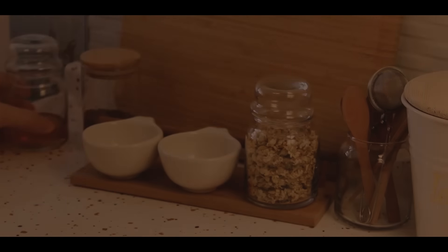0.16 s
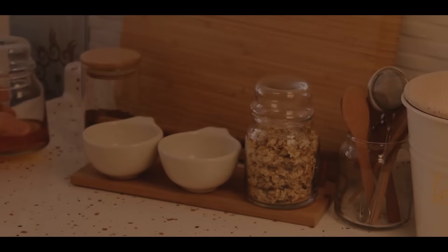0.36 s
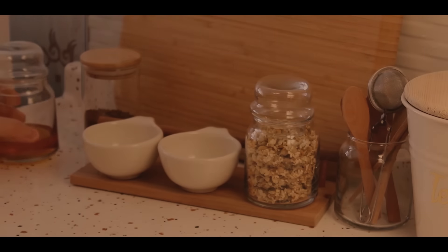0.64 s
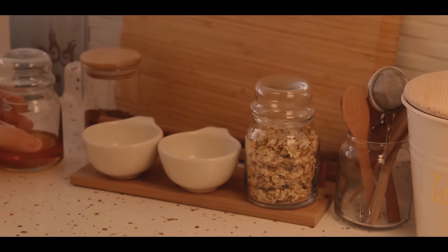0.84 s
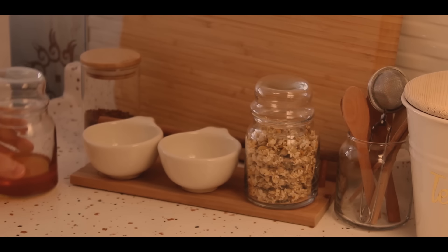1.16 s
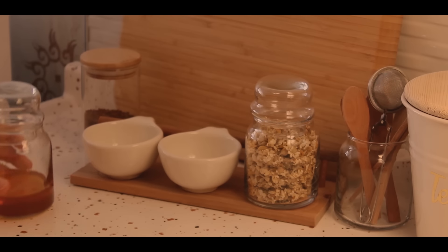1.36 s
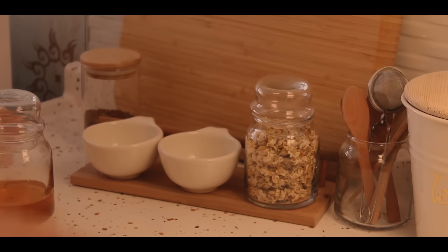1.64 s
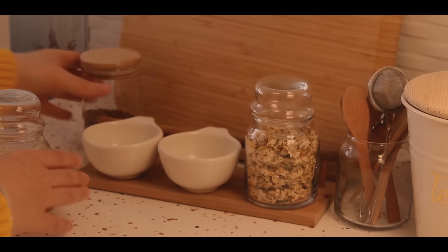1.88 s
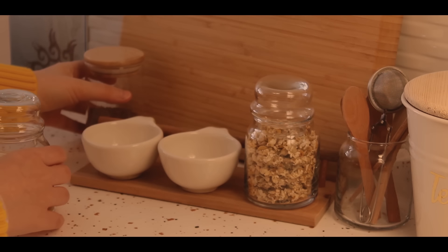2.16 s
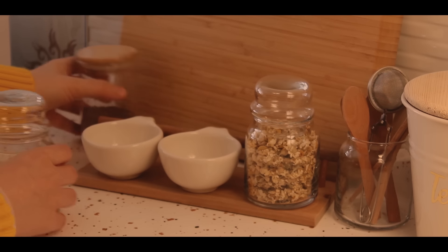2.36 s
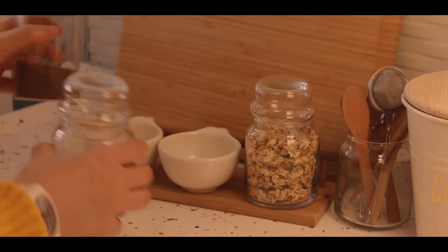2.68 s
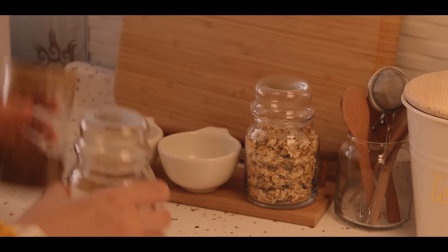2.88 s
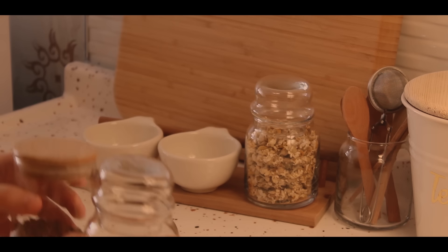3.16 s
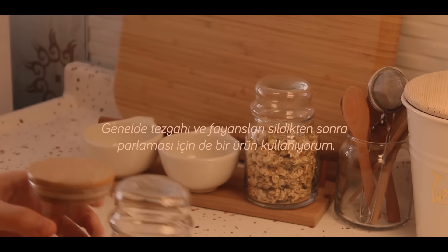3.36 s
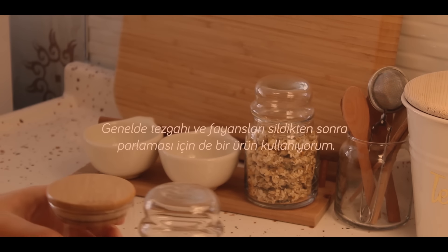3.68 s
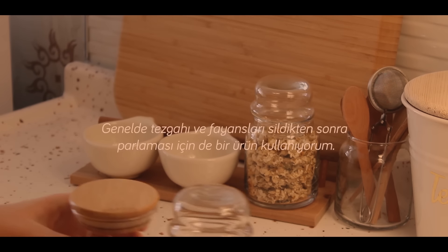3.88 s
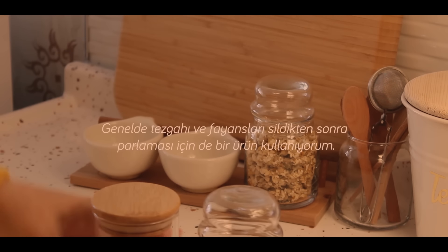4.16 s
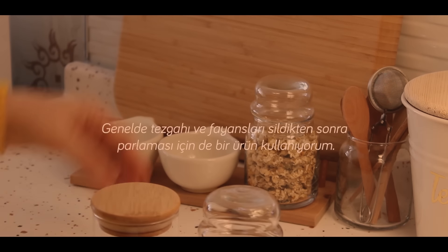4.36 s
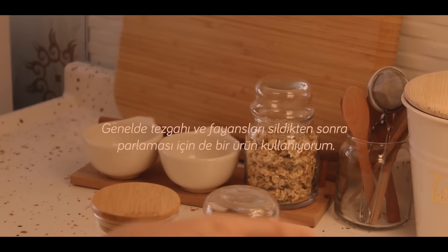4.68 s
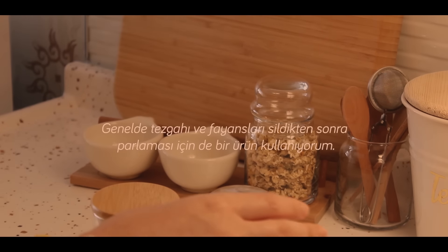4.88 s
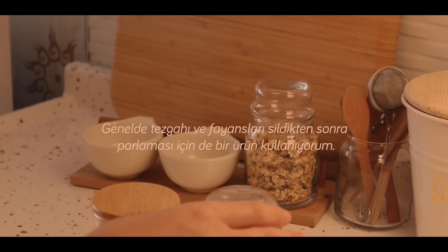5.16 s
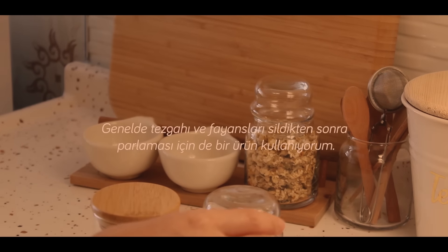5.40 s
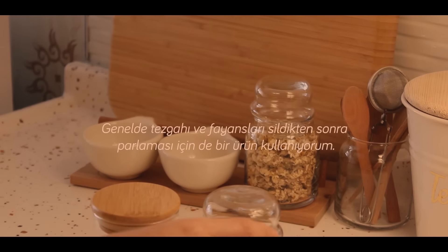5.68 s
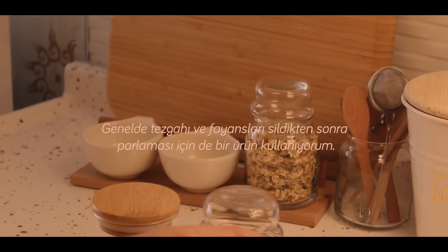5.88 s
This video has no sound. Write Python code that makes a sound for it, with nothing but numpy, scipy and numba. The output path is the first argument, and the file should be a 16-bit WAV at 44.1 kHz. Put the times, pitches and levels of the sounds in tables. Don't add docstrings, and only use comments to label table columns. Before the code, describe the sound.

Glass jars and a wooden-lidded canister are set down on a hard kitchen counter in spaced, dull knocks with brief scrapes, over quiet fridge hum.

```python
import sys
import numpy as np
from scipy import signal
from scipy.fft import rfft, irfft, next_fast_len
from scipy.io import wavfile
from scipy.ndimage import uniform_filter1d
from numba import njit

SR = 44100
rng = np.random.default_rng(int(sys.argv[2]) if len(sys.argv) > 2 else 0)


def magnitude_from_level(level_db):
    exponent = np.asarray(level_db, float) / 20
    return 10 ** exponent


def unload_wav(signal):
    wavfile.write(
        sys.argv[1],
        SR,
        np.round(np.clip(np.atleast_2d(signal).T, -1, 1) * 32767).astype(np.int16),
    )


N = 266099
SPAN = 32768

# (frequency [Hz], density [dB per Hz])
AIR_COLOUR = [(71, -49.5), (120, -12), (166, -13), (188, -18), (288, -4), (360, -9), (498, -5.5),
              (586, -8.5), (994, -10), (1100, -11.5), (2430, -18.5), (13700, -35.5), (15400, -47.5)]
# (frequency [Hz], level [dB])
FRIDGE_LINES = [(199.2, -79.5), (279.9, -76), (393.0, -75), (446.8, -79.5), (495.3, -74.5), (543.7, -80.5),
                (893.6, -85.5)]
# (frequency [Hz], width [Hz], level [dB])
HOUSE_RUMBLE = [(30, 30, -97.5), (50.35, 17, -88.5), (72, 30, -102), (105, 40, -93), (164.4, 19, -82)]
# (frequency [Hz], T60 [s])
ROOM_DECAY = [(100, 0.2), (250, 0.38), (500, 0.46), (1000, 0.42), (2000, 0.34), (4000, 0.23), (8000, 0.092),
              (14000, 0.14)]
# (full speed at [s], held [s], level [dB], resonance [Hz])
DRAGS = [(.24, 0.012, -58, 700), (.36, .02, -59, 1200), (1.16, 0.12, -52.5, 500), (1.27, 0.037, -50.5, 534),
         (1.32, 0.035, -48, 720), (1.39, 0.027, -52, 720), (1.45, .04, -54, 910), (1.54, 0.055, -56.5, 850),
         (2.3, .004, -55, 800), (2.56, 0.067, -64.5, 602), (3.53, .004, -55, 683.5),
         (5.45, 0.044, -54, 860), (5.569, 0.017, -61, 500)]

# its blows (time [s], peak [dB], contact [ms]),
# its colour (frequency [Hz], density [dB per Hz]), its resonances (frequency [Hz], width [Hz], level [dB]).
HONEY_JAR = ([(0.841, -11.5, 4.5)], [(88, -62), (150, -37.5), (290, -25), (579, -1), (658, -4.5),
              (1230, -7), (1700, -8.5), (2540, -30.5), (7000, -78.5), (9100, -105), (15400, -120)],
              [(617, 30, -1.5), (705, 73, 5), (1258, 54, 13), (1710, 32, -1)])
JAR_WOBBLE = ([(0.961, -25, 4.9), (1.042, -36, 5.5), (1.093, -31.5, 8.5), (1.129, -58, 6.8),
               (1.271, -40, 5), (1.429, -42, 4.3)], [(120, -51), (200, -28.5), (447, -4), (490, -4),
               (728, -7), (843, -4), (1740, -27), (3000, -65), (3900, -67), (6600, -120)], [(510, 16, 0.12),
               (624, 40, 0), (695, 30, -1)])
JAR_LIFT = ([(2.314, -15, 3.34)], [(150, -64), (280, -35), (390, -10), (520, -24.5), (680, -9.5),
             (1000, -7.5), (1800, -18), (2100, -29), (2600, -26.5), (3600, -41), (5000, -54), (10000, -72),
             (14000, -110)], [(409, 35, 4), (670, 24, 0.5), (1345, 33, -4.5), (1702, 35, -1)])
HEAVY_JAR = ([(3.542, -.6, 3.2)], [(120, -54.5), (200, -26.5), (379, -7), (430, -12), (486, -5.5),
              (602, -7.5), (772, -3.5), (1340, -2), (1750, -7.5), (2240, -11), (3200, -24.5), (8820, -60),
              (11300, -63), (12600, -73)], [(497, 40, -5), (838, 90, -2.5), (1020, 35, -2.5), (1282, 40, 2),
              (1530, 24, 2), (1820, 46, -4), (2410, 30, 1)])
BASE_EDGE = ([(3.709, -9, 1.15)], [(120, -58), (200, -28), (561, -1), (639, -2), (1430, -2.5), (1550, -2),
              (2110, -12.5), (2290, -7.5), (3080, -12), (4060, -37.5), (10000, -78), (13000, -103),
              (22000, -120)], [(791, 140, -7.5), (1220, 63, -1), (1594, 40, 15), (2310, 80, 1)])
JAR_ROCK = ([(3.861, -16, 5.5)], [(240, -62), (400, -29.5), (600, -20), (900, -6.5), (1300, -3.5),
             (1800, -12.5), (2700, -11.5), (4500, -32.5), (6000, -59.5), (8000, -68), (11000, -100)],
             [(1300, 270, -1.7), (1525, 30, -2)])
JAR_SETTLE = ([(4.036, -30.5, 8.4)], [(240, -62), (400, -34), (693, -19), (770, -7.5), (1120, -10),
               (1310, -2.5), (2140, -18), (4000, -68), (5200, -81.5), (8800, -120)], [(780, 40, -24),
               (1400, 12.2, 3.5)])
SOFT_TOUCH = ([(5.176, -29.5, 14)], [(59, -62), (100, -25.5), (167, -26), (415, -5), (1060, -30.5),
               (1270, -13.5), (1520, -40), (1690, -26), (7000, -60.5), (9100, -96.5), (15400, -120)],
               [(400, 32, 3), (1280, 66, -12)])
CANISTER_LANDING = ([(5.216, -7, 3.49), (5.2755, -22, 1.5)], [(90, -71), (200, -43), (360, -8), (560, -12),
                     (850, -1), (1080, -20.5), (1330, -8.5), (1800, -13.5), (2600, -23.5), (3300, -29),
                     (4300, -49), (6000, -72), (9000, -100)], [(370, 110, 1.7), (670, 20, 5.1),
                     (771, 36, 2.7), (895, 6.2, 6.5), (944, 6.4, 24), (1338, 18, 5)])
GLASS_NUDGE = ([(5.031, -47, 5.6)], [(350, -34), (600, -6.5), (818, -10.5), (1230, -4.5), (1560, -11.5),
                (2020, -12.5), (2540, -17), (4230, -13), (15000, -48)], [(1240, 32, -9), (3160, 28, 11),
                (4190, 37, 7)])
LID_CHATTER = ([(5.4171, -50, 1.2), (5.4779, -38.5, 1.2), (5.5578, -37, 1.2), (5.5624, -39, 2)],
                [(400, -44), (600, -25), (1300, -2), (2200, -11), (2950, -15.5), (3250, -6.5), (4100, -1.5),
                (7000, -13.5), (10400, -15), (15400, -32)], [(3140, 80, 8), (5270, 170, -5), (6800, 190, 2),
                (8500, 610, 1.5), (10300, 400, -10)])
JAR_CLINK = ([(5.8803, -32, 3.7), (5.892, -33.5, 3)], [(350, -25), (600, -12), (900, -5), (1270, -1),
              (1600, -4.5), (2400, -6), (4200, -9.5), (7000, -18.5), (11800, -23), (15400, -45)],
              [(1283, 46, 6), (4080, 119, 3), (5190, 110, 3), (10700, 140, -1)])
GLASS_RATTLE = ([(6.0064, -34.5, 2), (6.0124, -33, 0.31), (6.0162, -31, 1.2)], [(120, -28), (200, -19),
                 (315, 3), (811, -21), (1280, -18), (1450, -10), (2210, -15.5), (3740, -0.5), (6000, -4),
                 (7740, -9), (8480, -1), (15400, -28)], [(328, 43, 12), (4930, 53, 12), (5860, 34, 16),
                 (8950, 170, -8), (10700, 44, -21.5)])
COUNTER_BOOM = ([(3.552, -39, 35.7), (5.18, -57, 30)], [(35, -62.5), (60, -31.5), (97, -10), (135, -13.5),
                 (167, 5.5), (210, -10), (260, -3.5), (340, -31.5), (570, -120)], [(101, 14, 0),
                 (167, 14, 0.0031)])
SHARP_TICK = ([(5.2764, -59, 1), (5.914, -36.5, 1)], [(2350, -41), (4000, 0), (5740, -18.5), (6650, -12),
               (10900, -24), (11800, -22.5), (15400, -31)], [(8700, 300, 6)])
# (resonance level [dB], room share [dB], decay stretch [ratio])
OBJECT_PLACES = [(-10, 3, 1.15), (2, 0, 0.91), (6, 4.5, 0.83), (-2.5, 3.5, 1.01), (-14.5, 1, 1.17),
                 (3.5, 6.5, 0.83), (-2, 5, 0.81), (7.5, 2.5, 1.5), (0, 2.5, 0.92), (3.5, 6, 0.81),
                 (8, 2.5, 1.2), (2, 0.5, 0.7), (-4, 2.5, 1.01), (-0.5, 0.5, 0.63), (-2, 4, .9)]

# (start [s], end [s], frequency [Hz], width [Hz], level [dB])
SINGING_WALLS = [
    (.95, 1.5, 10940, 300, -96),
    (1.27, 1.43, 7520, 199, -88),
    (3.541, 3.576, 10700, 505.5, -58.5),
    (3.76, 3.78, 10700, 299.5, -80),
]
# (frequency [Hz], density [dB])
TOP_HISS_COLOUR = [(12000, -58.5), (12350, -0.5), (14000, -1), (15300, -8), (15600, -59.5)]


def shape(points, count):
    hz, db = np.transpose(points)
    bins_hz = np.arange(count // 2 + 1) * SR / count
    return magnitude_from_level(np.interp(np.log(bins_hz + 1), np.log(hz), db))


def coloured_noise(points):
    count = next_fast_len(N)
    white = rfft(rng.standard_normal(count))
    return irfft(white * shape(points, count), count)[:N]


def causal(gain):
    cepstrum = irfft(np.log(gain))
    half = len(cepstrum) // 2
    cepstrum[1:half] *= 2
    cepstrum[half + 1:] = 0
    return np.exp(rfft(cepstrum))


def even(x, smooth_hz):
    spectrum = rfft(x, SPAN)
    power = uniform_filter1d(np.abs(spectrum) ** 2, max(int(smooth_hz * SPAN / SR), 1))
    return spectrum / causal(np.sqrt(power) + 1e-9)


def level(x, db):
    return x * magnitude_from_level(db) / np.sqrt(np.mean(x ** 2))


@njit
def moving_band(x, hz, width):
    y, band_state, low_state = np.empty(len(x)), 0., 0.
    for i in range(len(x)):
        g = np.tan(np.pi * hz[i] / SR)
        k = width[i] / hz[i]
        v = (band_state + g * (x[i] - low_state)) / (1 + g * (g + k))
        band_state = 2 * v - band_state
        low_state = low_state + 2 * g * v
        y[i] = k * v
    return y


def band(x, hz, width):
    g = np.tan(np.pi * hz / SR)
    k = g * width / hz
    a0 = 1 + k + g * g
    section = np.array([k, 0, -k, a0, 2 * (g * g - 1), 1 - k + g * g]) / a0
    return signal.sosfilt([section] * 2, x)


def noise_band(hz, width, db):
    return level(band(rng.standard_normal(N), hz, width), db)


def walk(rate):
    hold = int(SR / rate)
    steps = np.repeat(rng.standard_normal(N // hold + 1), hold)
    return 0.26 * uniform_filter1d(uniform_filter1d(steps, hold), hold)[:N]


def air():
    hiss = level(coloured_noise(AIR_COLOUR), -66.5) * magnitude_from_level(0.93 * walk(11.0))
    fridge = sum(noise_band(hz, 16, db) * magnitude_from_level(3.0 * walk(3)) for hz, db in FRIDGE_LINES)
    rumble = sum(noise_band(hz, width, db) for hz, width, db in HOUSE_RUMBLE)
    t = np.arange(N) / SR
    mains = level(np.sin(2 * np.pi * 100.4 * t + 0.9 * walk(3.0)), -81.5)
    return hiss + fridge + rumble + mains


def kitchen(room_db, stretch):
    rise_s, end_s = 0.0006, 0.39
    wall_s, wall_db = .0175, -12
    t = np.arange(SPAN // 2) / SR
    hz, t60 = np.transpose(ROOM_DECAY)
    noise = rng.standard_normal(len(t)) * magnitude_from_level(2.0 * walk(250)[:len(t)])
    tail = 0
    for centre in 70 * 2 ** np.arange(0, 8, .5):
        band_t60 = np.interp(np.log(centre), np.log(hz), 1.053 * stretch * t60)
        tail = tail + band(noise, centre, centre / 2) * magnitude_from_level(-60 * t / band_t60)
    tail *= (1 - np.exp(-t / rise_s)) * np.exp(-(t / end_s) ** 2 * 2.85)
    response = tail * magnitude_from_level(room_db) / np.linalg.norm(tail)
    response[0] += 1
    response[int(wall_s * SR)] += magnitude_from_level(wall_db)
    return even(response, 90)


def slides():
    speed_up, slow_down = 330, 449.5
    climb = 900
    upper_db = -9
    t = np.arange(N) / SR
    start, held, top_db, low_hz = np.transpose(DRAGS)
    clicks = rng.standard_normal(N) * (rng.random(N) < 350 / SR)
    clicks = clicks * magnitude_from_level(3.1 * walk(30.03))

    times = np.ravel([start, start + held], "F")
    hz = np.interp(t, times, np.ravel([low_hz, low_hz + climb * held], "F"))
    body = clicks
    for relative_width in (.5, 0.26, 1.3):
        body = moving_band(body, hz, relative_width * hz)
    body = level(body, -0.59)
    upper = level(band(band(clicks, 580, 540), 1150, 1200), -.5)

    efforts = []
    for s, hold, db in zip(start, held, top_db):
        before = np.maximum(s - t, 0)
        after = np.maximum(t - s - hold, 0)
        efforts.append(db - speed_up * before - slow_down * after)
    scrape = magnitude_from_level(np.max(efforts, axis=0)) * (body + magnitude_from_level(upper_db) * upper)
    return signal.fftconvolve(scrape, irfft(kitchen(0.64, 0.64)))[:N]


def burst(ms):
    x = np.arange(8192) * 1000 / SR / max(ms, .2)
    return even(rng.standard_normal(len(x)) * np.sqrt(x) * np.exp(-2 * x), 30)


def knock(blows, colour, modes, ring_db, room_db, stretch):
    scatter_ms = 2.4
    t = np.arange(SPAN) / SR
    ring = 0
    for hz, width, db in modes:
        ring = ring + magnitude_from_level(db) * width * np.exp(-np.pi * width * t) * np.cos(2 * np.pi * hz * t)
    body = causal(shape(colour, SPAN)) * (1 + magnitude_from_level(ring_db) * rfft(ring) * 2 * np.pi / SR)
    out = np.zeros(N + SPAN)
    for s, peak_db, contact_ms in blows:
        scatter = burst(min(scatter_ms, contact_ms))
        sound = irfft(burst(contact_ms) * scatter * body * kitchen(room_db, stretch))
        i = int(s * SR)
        out[i:i + SPAN] += sound * magnitude_from_level(peak_db) / np.abs(sound).max()
    return out[:N]


def singing():
    t, out = np.arange(N) / SR, 0
    for start, end, hz, width, db in SINGING_WALLS:
        fade = np.interp(t, [start - .002, start, end, end + .03], [0.0098, 1, 0.39, 0.01])
        out = out + fade * noise_band(hz, width, db)
    return out * magnitude_from_level(4.0 * walk(30))


def scene():
    objects = (HONEY_JAR, JAR_WOBBLE, JAR_LIFT, HEAVY_JAR, BASE_EDGE, JAR_ROCK, JAR_SETTLE, SOFT_TOUCH,
               CANISTER_LANDING, GLASS_NUDGE, LID_CHATTER, JAR_CLINK, GLASS_RATTLE, COUNTER_BOOM, SHARP_TICK)
    knocks = sum(knock(*thing, *place) for thing, place in zip(objects, OBJECT_PLACES))
    return (knocks + slides() + singing() + air())[None]


def band_limit(x):
    return signal.sosfilt(signal.butter(12, 15600, fs=SR, output="sos"), x)


def record(dry):
    loud_db = 10 * np.log10(uniform_filter1d(dry[0] ** 2, 1500) + 1e-12)
    gate = 1 / (1.0 + np.exp((-47.5 - loud_db) / 3))
    hiss = level(coloured_noise(TOP_HISS_COLOUR), -81)
    top_cut = signal.ellip(8, .2, 60, 15450, fs=SR, output="sos")
    mix = signal.sosfilt(top_cut, dry + gate * hiss)
    return band_limit(mix)


dry = scene()
out = record(dry)
unload_wav(out)
```